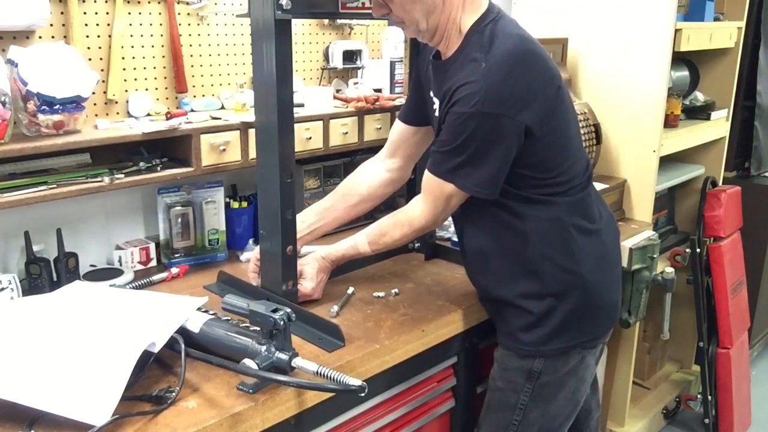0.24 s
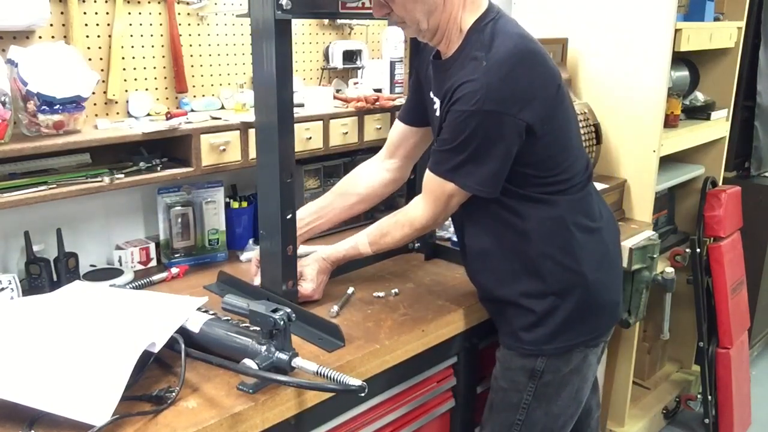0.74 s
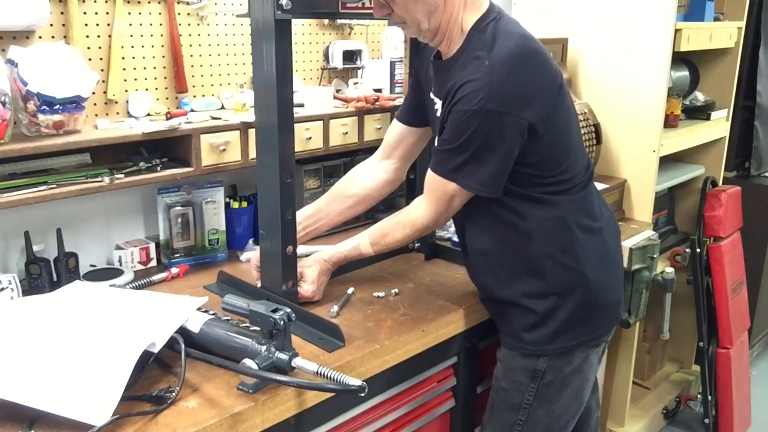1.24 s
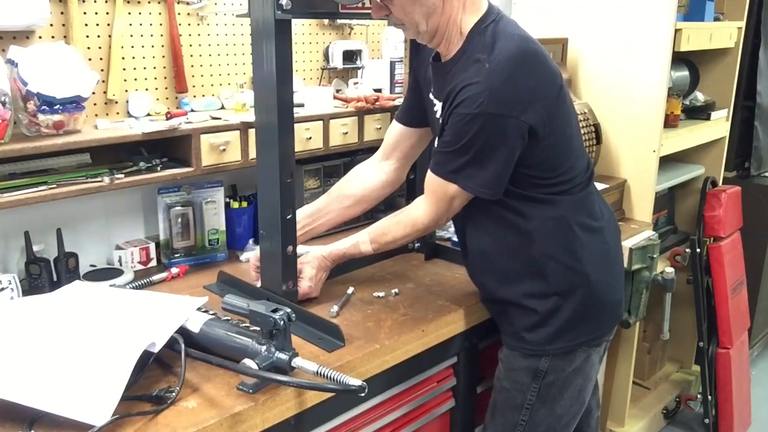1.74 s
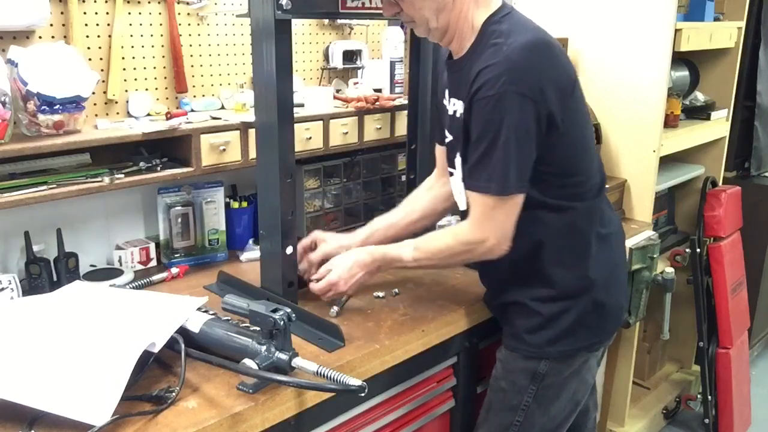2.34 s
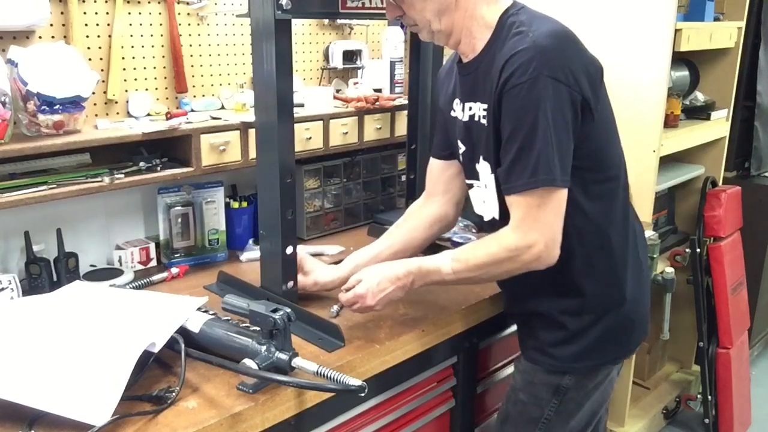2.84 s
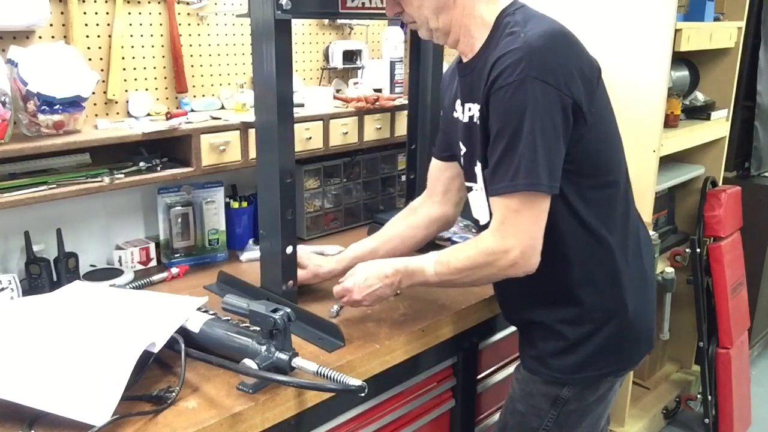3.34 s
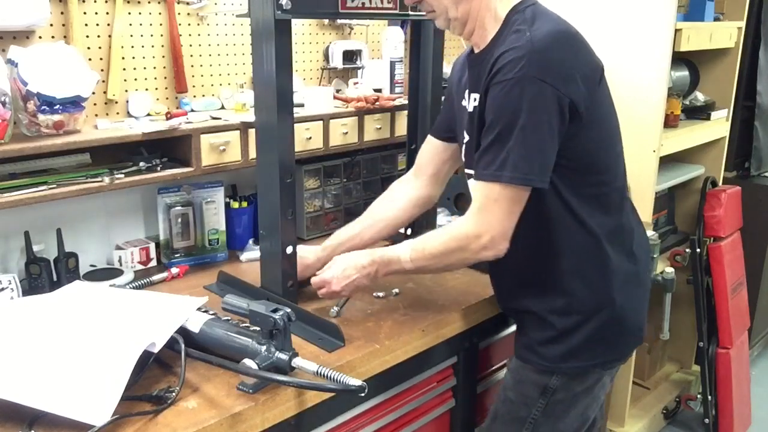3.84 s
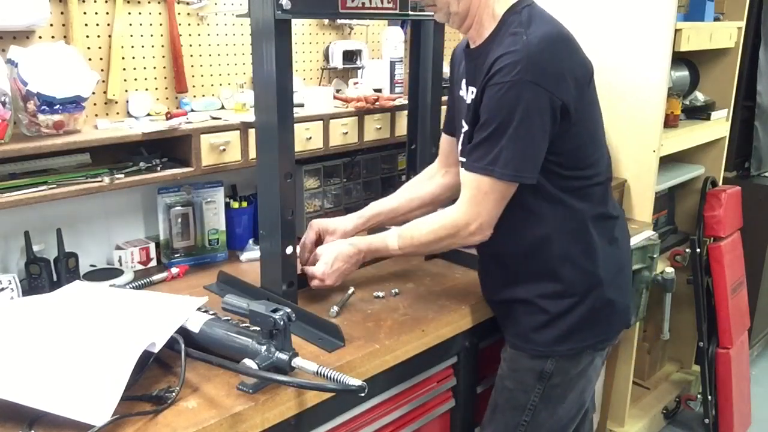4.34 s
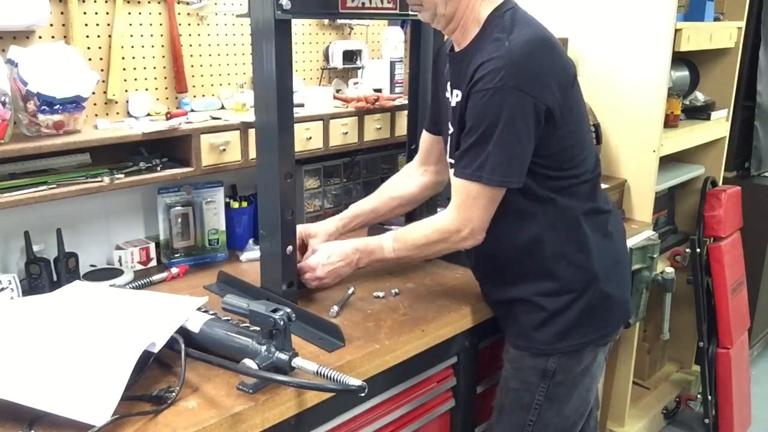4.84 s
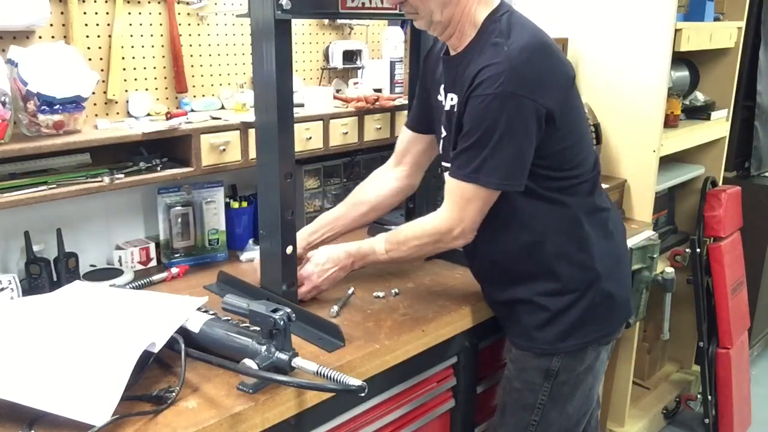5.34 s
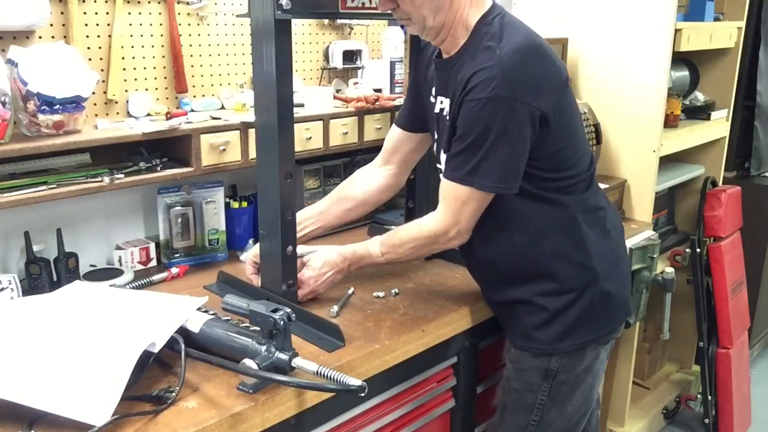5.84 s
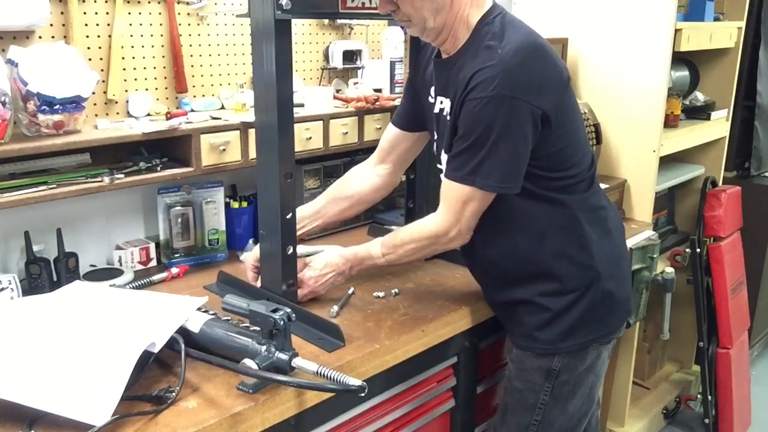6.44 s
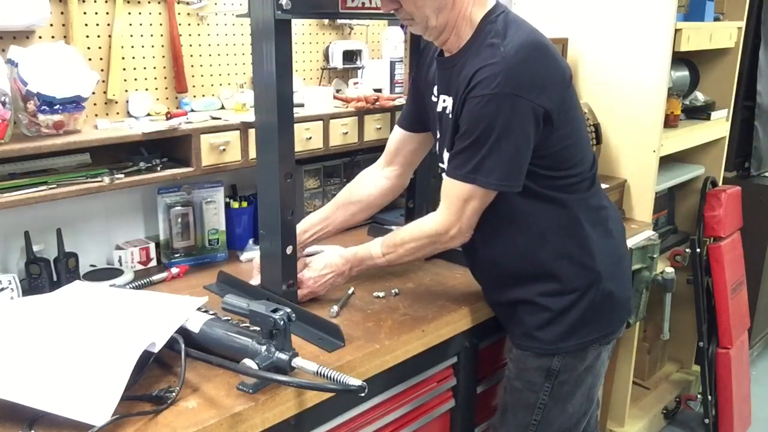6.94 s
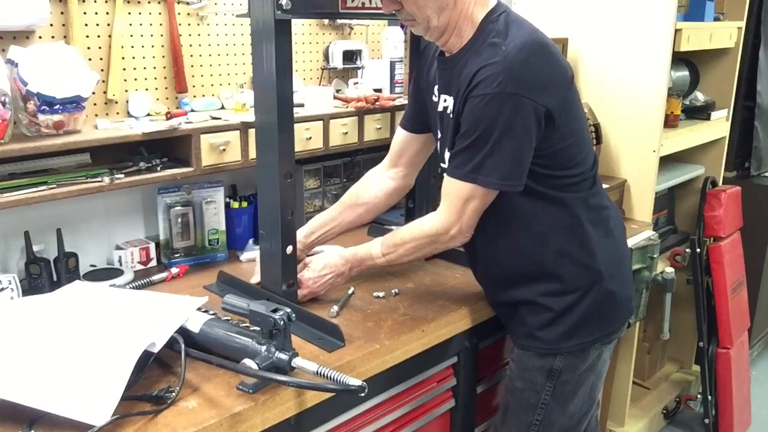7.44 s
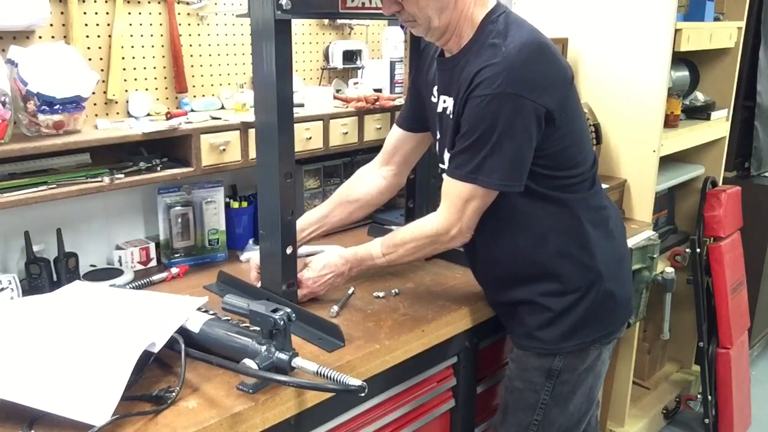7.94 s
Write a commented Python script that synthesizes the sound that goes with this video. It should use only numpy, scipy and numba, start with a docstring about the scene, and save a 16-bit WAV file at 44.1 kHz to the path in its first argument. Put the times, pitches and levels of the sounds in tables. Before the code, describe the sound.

Uneven metallic knocks, short rattles, bright pings and faint scraping of small steel hardware, over low room rumble and hiss.

```python
"""A soft knock of steel on steel comes first, then bolts, nuts and washers rattle on a steel frame.
Hands fit the parts on a workbench: each knock or rub is a short chatter of contacts that rings many
tones of the frame, the bolts and the nuts. Fine scraping, single pings and dull bumps come between.
A small workshop answers with a fading echo; rumble, lamp buzz and microphone hiss lie under it."""
import sys
import numpy as np
from scipy import signal
from scipy.fft import rfft, irfft
from scipy.io import wavfile
from scipy.ndimage import uniform_filter1d
from numba import njit

SR = 44100
rng = np.random.default_rng(int(sys.argv[2]) if len(sys.argv) > 2 else 0)


def wav_out(sig):
    """Save sig, one row per channel (or a flat mono array), as 16-bit PCM at SR to the path in sys.argv[1]."""
    wavfile.write(sys.argv[1], SR, np.round(np.clip(np.atleast_2d(sig).T, -1, 1) * 32767).astype(np.int16))


N = 360738  # length in samples


def undb(db):
    """Turn a level in dB into a gain."""
    return 10 ** (np.asarray(db) / 20)


def noise(shape, lo_hz, hi_hz, size):
    """Noise of rms 1, coloured by (pitch_hz, level_db) points and kept between two soft edges."""
    hz = np.arange(size // 2 + 1) * SR / size + 1  # the 1 keeps the logarithm finite
    at_hz, level_db = np.transpose(shape)
    edges = np.sqrt((1 + (lo_hz / hz) ** 12.) * (1 + (hz / hi_hz) ** 12.))
    gain = undb(np.interp(np.log(hz), np.log(at_hz), level_db)) / edges
    x = irfft(rfft(rng.standard_normal(size)) * gain, size)
    return x / x.std()


def walk(rate):
    """A wandering level: random values, each held 1 / rate s, smoothed twice; spread near 1."""
    hold = int(SR / rate)
    steps = np.repeat(rng.standard_normal(N // hold + 1), hold)
    return 1.3 * uniform_filter1d(uniform_filter1d(steps, hold), hold)[:N]


# share of the contact force kept from sample to sample: steel on steel, and on the bench top
SOFT, PADDED = .98, .996


@njit
def add(out, start, push, poles, gains, soft):
    """A push rings a set of modes, each scaled to its own peak; a soft contact feeds only near its tone."""
    ring = np.empty(len(out))
    for m in range(len(poles)):
        # follow the mode until it sinks under the hiss
        fade = int(np.log(5e-6 / max(gains[m], 5e-6)) / np.log(abs(poles[m])))
        count = min(len(out) - start, len(push) + fade)
        force, state, top = 0j, 0j, 1e-12
        feed = poles[m] * soft
        for i in range(count):
            if i < len(push) + 2000:
                force = force * feed + (push[i] if i < len(push) else 0.)
                top = max(top, abs(state.imag))
            else:
                force = 0j
            state = state * poles[m] + force
            ring[i] = state.imag
        for i in range(count):
            out[start + i] += gains[m] / top * ring[i]


def pole(hz, t60):
    """Turn and fade of a mode in one sample; t60 is the time to fade by 60 dB, in s."""
    return np.exp((2j * np.pi * hz - np.log(1000) / t60) / SR)


def chatter(rise_ms, ms, chance):
    """A hail of uneven contacts that swells and then thins out; energy 1."""
    t_ms = np.arange(max(int((rise_ms + ms) * SR / 1000), 8)) / SR * 1000
    contacts = chance[:len(t_ms)] ** 3  # cubing leaves a few strong hits among many weak ones
    swell = np.minimum(t_ms / rise_ms, 1)
    push = contacts * swell * np.exp(-3 * np.maximum(t_ms - rise_ms, 0) / ms)
    return push / np.sqrt(np.sum(push ** 2))


# knocks of steel on steel: time_s (halfway up the swell), level_db (reference),
# softness_db (low range of the frame), bolts_db, nuts_db (these three against the reference),
# tone_hz (favoured tone), chatter_ms, ring_s (multiplied by a factor for each range)
KNOCKS = [(0.05, -44.5, -9, -40, -29, 1390, 28, 0.15), (0.088, -44, -8, -35, -32, 1860, 49, 0.27),
          (0.314, -44, -13.5, -14, -17, 4230, 20, 0.18), (0.396, -36, -6, -43, -41, 1250, 28, 0.15),
          (0.553, -36, -11.5, -26, -32, 1850, 14, 0.28), (0.623, -48.5, -6, -18, -26, 1250, 26, 0.12),
          (0.678, -47.5, -5.5, -26, -30, 1400, 18, 0.11), (0.794, -50.5, -12, -12.5, -21, 3650, 15, 0.22),
          (1.003, -40, -7, -33, -37, 1740, 12, 0.22), (1.168, -44.5, -11.5, -11, -17, 3600, 20, 0.22),
          (1.398, -41, -6.5, -17, -33, 2440, 18, 0.14), (1.503, -31.5, -12, -23, -31, 2500, 14, 0.22),
          (1.735, -42.5, -7.5, -12.5, -37, 1340, 38, 0.28), (1.807, -35, -20.5, -3.5, -14, 2760, 26, 0.27),
          (1.874, -36.5, -12, -21, -39, 2820, 13, 0.21), (2.564, -21.5, -16, -22, -32.5, 1420, 12, 0.23),
          (2.66, -25, -19.5, -16, -25, 1410, 35, 0.16), (2.712, -23.5, -16, -5, -15.5, 2970, 16.5, 0.18),
          (2.868, -30, -10, -21, -34, 1250, 26, 0.18), (2.946, -22.5, -17.5, -7.5, -13, 5820, 43, 0.12),
          (3.039, -24, -15, -14.5, -32, 3780, 29, 0.083), (3.073, -34.5, -8, -10, -40, 3230, 18, 0.23),
          (3.096, -34, -23.5, -7, -27, 5670, 24, 0.24), (3.255, -46, -23.5, -35, -42, 2840, 18, 0.26),
          (3.32, -24, -17, -9, -14, 3570, 19.5, 0.17), (3.396, -32.5, -15.5, -14, -26, 3660, 9.9, 0.13),
          (3.582, -38.5, -19, -23, -43, 2480, 21, 0.15), (3.687, -32.5, -19, -11, -30, 3640, 21, 0.32),
          (3.728, -20, -19, -11.5, -18.5, 3770, 12.6, 0.22), (3.877, -32.5, -13, -19, -34, 1250, 32, 0.42),
          (3.909, -28, -21.5, -11.5, -23, 3660, 6.4, 0.18), (4.023, -39, -17, -20.5, -46, 4010, 8.8, 0.19),
          (5.403, -21, -22.5, -10, -9, 3710, 22, 0.15), (5.458, -51, -32, -6, 5, 4000, 25, 0.22),
          (5.613, -45, -7.5, 3.5, -23, 5090, 22, 0.2), (5.641, -46.5, -25.5, -3, -27, 5040, 29, 0.14),
          (5.749, -60, -25, -4, -4.5, 4900, 16, 0.14), (5.802, -57, -31, -10, -10, 3830, 20, 0.18),
          (5.94, -57.5, -6, -20, -22, 1330, 21, 0.15), (5.989, -55, -21, -15, -24, 3840, 12, 0.13),
          (6.013, -62, -22, -1, -16, 5110, 18, 0.14), (6.069, -58.5, -13, -6.5, -22, 1440, 18, 0.15),
          (6.212, -36.5, -22.5, -17.5, -22.5, 3770, 20, 0.076),
          (6.273, -38.5, -20.5, -31, -46, 3790, 26, 0.06), (6.836, -47.5, -11.5, -24, -20, 2430, 18, 0.26),
          (6.856, -42, -16, -11, -7.5, 2450, 18, 0.11), (6.884, -45, -8.5, -24, -35, 1680, 12, 0.18),
          (6.934, -33.5, -18.5, -2.5, -13, 5160, 32, 0.14), (6.974, -36, -20, -7, -8, 3840, 26, 0.1),
          (7.118, -55, -18, -6, -30, 5150, 25, 0.32), (7.155, -56.5, -30, -21, -38, 3820, 18, 0.21),
          (7.354, -51.5, -19, -7, -9.5, 4130, 14, 0.091), (7.453, -54.5, -14, -13, -14, 1680, 20, 0.23),
          (7.825, -42.5, -10, -32, -34, 2430, 22, 0.12), (8.079, -53.5, -14, -7.5, -9, 1680, 21, 0.13)]
# parts that slide into contact and swell before they fade: same columns as the knocks
RUBS = [(0.121, -37.5, -8.5, -27, -29, 2330, 13, 0.21), (0.946, -48.5, -6.5, -26, -27, 1550, 13, 0.28),
        (0.971, -43.5, -8.5, -23, -30, 1680, 13, 0.22), (1.128, -48, -1.5, -24, -29, 1060, 11, 0.19),
        (1.297, -51.5, -9, -29, -25, 1680, 21, 0.66), (1.363, -40.5, -5, -23, -28, 1300, 26, 0.23),
        (1.774, -28, -10.5, -17.5, -22.5, 2330, 18, 0.33), (6.171, -58, -18, -2, -30, 5300, 18, 0.33),
        (6.195, -45.5, -12, -10, -29, 3810, 28, 0.11), (6.33, -44, -10.5, -12.5, -35, 1700, 12, 0.14),
        (6.445, -50.5, -9, -21, -37, 1430, 12, 0.27), (6.461, -44, -13, -14.5, -40, 1420, 23, 0.15),
        (6.923, -33, -14, -11, -17, 5110, 30, 0.38), (7.199, -48.5, -11, -12, -20, 4360, 31, 0.23)]
# edges of five ranges, three for the frame, then bolts, then nuts: pitch_hz
BAND_EDGES_HZ = [620, 1500, 2650, 4450, 8500, 15800]
# ringing tones of the steel frame: pitch_hz, level_db (relative)
FRAME = [(649, -9), (716, -9), (872, -11), (1069, -5), (1249, -8), (1410, -5), (1515, -8), (1680, -2),
         (1758, -7), (1863, -8), (1965, -7), (2218, -10), (2439, -4), (2557, -8), (2754, -5), (2864, -5),
         (3144, -9), (3192, -6), (3305, -5), (3400, -5), (3650, -4), (3814, -2), (3941, -7), (4212, -5),
         (4360, -7)]
# ringing tones of the bolts: pitch_hz, level_db (relative)
BOLTS = [(4503, -10), (4646, -10), (4912, -4), (5114, -3), (5311, -10), (5566, -4), (5741, 0), (6129, -7),
         (6333, -9), (6420, -3), (6778, -20), (6996, -12), (7146, -5), (7375, -15), (7440, -18),
         (7512, -12), (7749, -22), (7989, -15), (8218, -12), (8312, -16)]
# ringing tones of the nuts and washers: pitch_hz, level_db (relative)
NUTS = [(8772, 0), (9092, -3), (9340, -8), (9612, -3), (10099, -8), (10516, -5), (10675, -12), (11012, -6),
        (11291, -1), (11442, -6), (11684, -17), (11905, -4), (12301, -11), (12613, -6), (12758, -3),
        (13068, -5), (13238, -12), (13569, -15), (13617, -14), (13865, -14), (14174, -20), (14516, -17),
        (15044, -17), (15103, -9), (15515, -9), (15647, -13)]
# colour of the many small frame tones, also used by the scraping: pitch_hz, level_db (per Hz, relative)
CLATTER = [(180, -27), (300, 12.5), (990, -2), (1360, 5.5), (1580, -3.5), (1710, -6), (2090, -7.5),
           (2820, -2), (3010, -2), (5650, -2.5), (6780, -43.5), (8990, -12), (15800, -35)]
KNOCK_RISE_MS, RUB_RISE_MS = 0.84, 15.7
MIDDLE_DB, TOP_DB = -9, -19  # upper ranges of the frame against the reference, the top at 0 dB softness
TRADE = 0.68  # dB that the top of the frame loses per dB of softness


def knocks():
    """Each knock or rub rings clear modes and a wash of small ones; softness favours the low frame."""
    hz, db = np.transpose(FRAME + BOLTS + NUTS)
    band = np.clip(np.searchsorted(BAND_EDGES_HZ, hz) - 1, 0, 4)
    wash = np.array([noise(CLATTER, lo, hi, N) for lo, hi in zip(BAND_EDGES_HZ, BAND_EDGES_HZ[1:])])
    wash_db = np.array([-11., -11., -12., -13., -14.])
    # factors on a row's ring time, one for each range
    wash_hold = np.array([0.82, 0.18, 0.7, 1.0, 1.0])
    mode_hold = np.array([0.5, 0.37, 0.38, 0.48, 0.82])
    events = [(*k, KNOCK_RISE_MS) for k in KNOCKS] + [(*r, RUB_RISE_MS) for r in RUBS]
    chances = rng.standard_normal((len(events), 4096))
    out, swell = np.zeros(N), np.zeros((len(wash), N))
    t = np.arange(SR // 2) / SR
    for event, chance in zip(events, chances):
        time_s, level_db, soft_db, bolts_db, nuts_db, tone_hz, ms, ring_s, rise_ms = event
        start = int((time_s - rise_ms / 2000) * SR)  # back from halfway up the swell to its foot
        ms, ring_s = np.clip(ms, .1, 60), max(ring_s, .02)
        range_db = np.array([soft_db, MIDDLE_DB, TOP_DB - TRADE * soft_db, bolts_db, nuts_db])
        band_gain = undb(level_db + range_db)

        # each knock lands on another spot: modes near its tone come forward, all vary by chance
        near_tone_db = 8 * np.exp(-(np.log(hz / tone_hz) / 0.025) ** 2)
        gain = undb(db + (near_tone_db + 4.95 * chance[-len(hz):]))
        gain = gain / np.sqrt(np.bincount(band, gain ** 2))[band] * band_gain[band]
        # each mode's ring time varies by chance around the row's value for its range
        spread = np.exp(.25 * chance[-2 * len(hz):-len(hz)])
        held_s = ring_s * mode_hold[band] * spread
        add(out, start, chatter(rise_ms, ms, chance), pole(hz, held_s), gain, SOFT)

        # the wash cracks out with the chatter, then fades as a fainter tail
        after = np.maximum(t - rise_ms / 1000, 0)
        crack = 2 * np.exp(-3000 * after / ms)
        tail = 0.63 * np.exp(-2 * np.log(1000) * after / (ring_s * wash_hold[:, None]))
        rise = np.minimum(1000 * t / (rise_ms + 1), 1) ** 2
        power = (band_gain * undb(wash_db))[:, None] ** 2 * (crack + tail) * rise
        swell[:, start:start + len(t)] += power[:, :N - start]
    flicker = undb([3.0 * walk(70) for _ in wash])  # the wash flickers at random, separately in each range
    return out + np.sum(wash * flicker * np.sqrt(swell), axis=0)


# fingers shift the parts about: time_s, level_db (rms of the fine scraping, before it wanders)
HANDLING = [(0, -72.5), (.8, -78.5), (1.7, -70.5), (2.0, -84), (2.5, -81.5), (2.8, -65), (3.299, -70.5),
            (4.001, -73.5), (4.198, -80), (5.3, -91), (5.399, -51.5), (5.8, -81), (6.4, -73), (6.7, -81),
            (7.05, -75), (7.4, -78), (7.7, -74.5), (8.18, -77)]


def handling():
    """Tiny slips of skin and thread: sparse grains in the colour of the frame."""
    slips = rng.random(N) < 900 / SR  # about 900 a second
    grains = slips * undb(3.3 * rng.exponential(size=N)) * rng.choice([-1, 1], N)
    t = np.arange(SR // 20) / SR
    grain_ring = noise(CLATTER, 700, 13000, len(t)) * undb(-60 * t / 0.24)
    scrape = signal.fftconvolve(grains, grain_ring)[:N]
    time_s, level_db = np.transpose(HANDLING)
    wandering_db = np.interp(np.arange(N) / SR, time_s, level_db) + 1.55 * walk(6)
    return scrape / scrape.std() * undb(wandering_db)


# single tones that ring out on their own, some of them tones of the frame and the bolts: start_s, pitch_hz,
# level_db (peak), ring_s (fade by 60 dB)
PINGS = [(.314, 3680, -51, 0.14), (0.311, 4220, -49, 0.1), (0.311, 5420, -57, 0.067),
         (1.168, 3610, -53, 0.11), (1.51, 5120, -43, 0.19), (1.51, 5700, -56, 0.16),
         (1.809, 9080, -38, 0.084), (2.716, 2864, -27.5, 0.13), (2.719, 5720, -35, 0.084),
         (2.721, 6420, -35, 0.065), (3.099, 5590, -39, 0.092), (2.96, 2775, -42, 0.43),
         (3.107, 2780, -48, 0.8), (5.401, 9540, -44.5, 0.52), (5.4, 7300, -41.5, 0.33),
         (5.403, 7050, -53, 0.57)]


def pings():
    """A brief chatter sets a single tone ringing."""
    out = np.zeros(N)
    chances = rng.standard_normal((len(PINGS), 512))
    for (start_s, hz, level_db, ring_s), chance in zip(PINGS, chances):
        ring_pole = pole(np.array([hz]), max(ring_s, .02))
        add(out, int(start_s * SR), chatter(1.0, 4.8, chance), ring_pole, undb([level_db]), SOFT)
    return out


# dull bumps through the bench top: start_s, level_db (reference, the tones lie below it), pitch_hz
BUMPS = [(1.771, -34.5, 364), (2.027, -68, 99.6), (2.059, -39, 101), (2.719, -36.5, 296),
         (2.731, -36.5, 148), (3.071, -41, 332), (3.044, -31, 145), (3.421, -37, 225), (5.21, -42.5, 105.5),
         (7.468, -41.5, 117)]


def bumps():
    """One padded push rings two low tones of the bench top, the higher one weaker."""
    out = np.zeros(N)
    for start_s, level_db, hz in BUMPS:
        tones = pole(hz * np.array([1, 1.6]), 0.14)
        add(out, int(start_s * SR), np.ones(1), tones, undb([level_db - 14.0, level_db - 23.0]), PADDED)
    return out


ROOM_T60_S, ROOM_TREBLE_T60_S, ROOM_DB = 0.33, 0.36, -10.5  # times to fade by 60 dB, echo level


def room(x):
    """A fading noise tail, a little longer in the treble, that starts after the first wall."""
    t = np.arange(int(.7 * SR)) / SR
    flat = [(100, 0), (9000, 0)]
    low = noise(flat, 150, 4000, len(t))
    high = noise(flat, 4000, 20000, len(t))
    tail = low * undb(-60 * t / ROOM_T60_S) + 0.94 * high * undb(-60 * t / ROOM_TREBLE_T60_S)
    tail = tail * np.clip((t - .003) / 0.013, 0, 1)  # silent for 3 ms, then grows
    return signal.fftconvolve(x, tail / np.sqrt(np.sum(tail ** 2)))[:N] * undb(ROOM_DB)


# colour of the shop's rumble and hiss: pitch_hz, level_db (per Hz, relative)
SHOP = [(15, -51), (25, -19), (47, -3.5), (94, -1), (144, -5.5), (179, -4.5), (205, -8), (228, -8),
        (333, -9.5), (500, -19), (672, -18), (1360, -26.5), (1730, -21), (2030, -27.5), (15800, -36)]
# hum tones of the lamps: multiple (of the mains pitch), level_db (rms)
BUZZ = [(16, -95), (20, -97), (24, -91), (26, -89), (28, -85), (30, -87), (32, -88), (34, -96), (36, -94),
        (39, -96), (44, -97)]
SHOP_DB = -64.5  # rms of rumble and hiss before they wander
MAINS_HZ = 60.02


def shop():
    """Rumble that swells and flickers, smooth hiss above it, and the buzz of the lamps."""
    whole = noise(SHOP, 10, 14500, N)
    rumble = signal.sosfilt(signal.butter(2, 300, fs=SR, output="sos"), whole)
    hiss = whole - rumble
    air = rumble * undb(1.5 * walk(1.5) + 2.5 * walk(9)) + hiss * undb(.3 * walk(3))
    t = np.arange(N) / SR
    buzz = np.zeros(N)
    for multiple, level_db in BUZZ:
        turns = multiple * MAINS_HZ * t + rng.random()
        buzz += undb(level_db) * np.sqrt(2) * np.sin(2 * np.pi * turns)
    return air * undb(SHOP_DB) + buzz


def scene():
    """The work on the bench, its echo and the shop around it."""
    work = knocks() + handling() + pings() + bumps()
    return (work + room(work) + shop())[None]


TOP_HZ = 15850


def record(dry):
    """The microphone drops the deepest bass and the recorder cuts the top."""
    thin = signal.sosfilt(signal.butter(3, 42, "high", fs=SR, output="sos"), dry)
    return signal.sosfilt(signal.ellip(10, .2, 70, TOP_HZ, fs=SR, output="sos"), thin)


dry = scene()
out = record(dry)
wav_out(out)
```